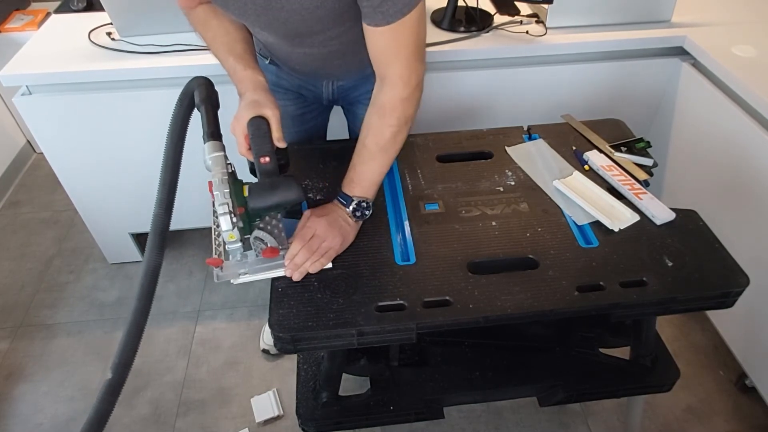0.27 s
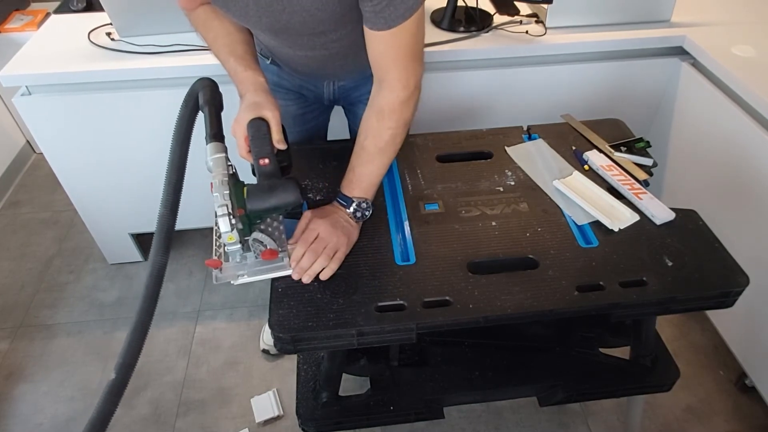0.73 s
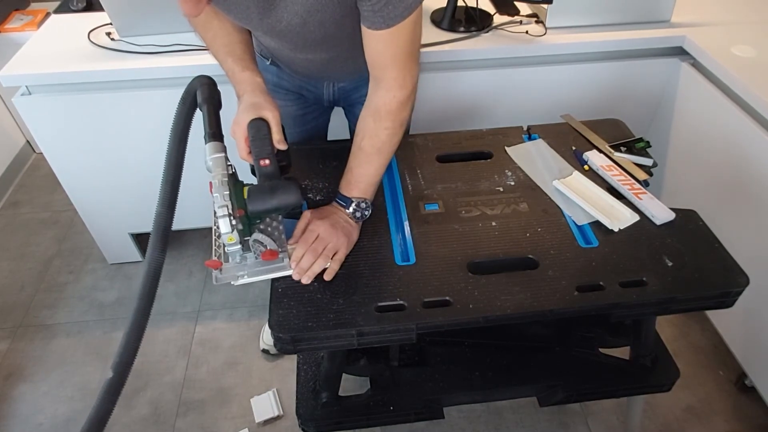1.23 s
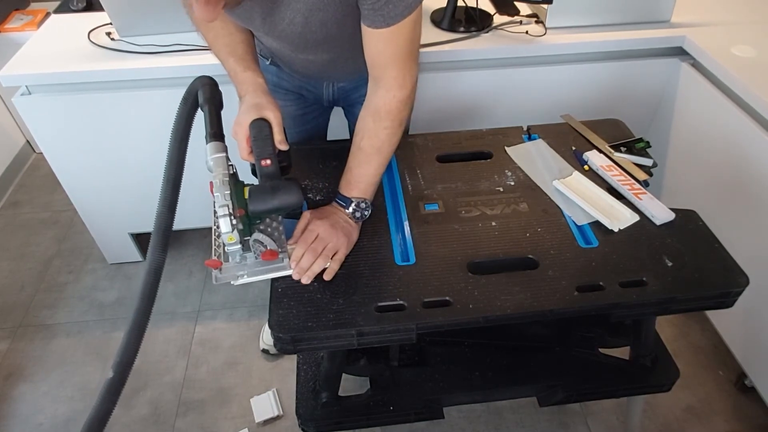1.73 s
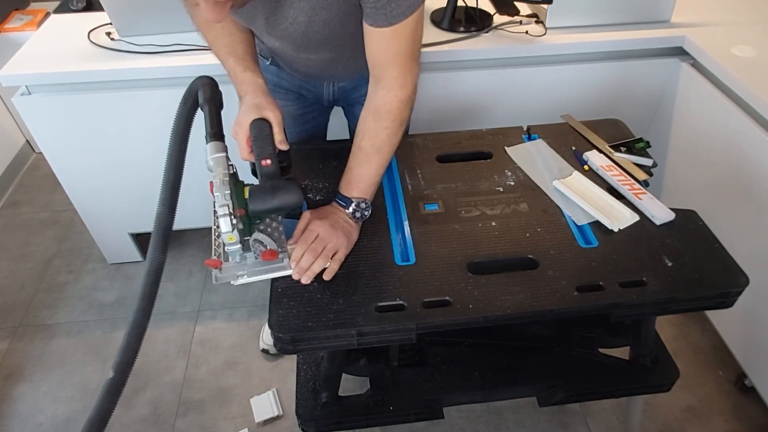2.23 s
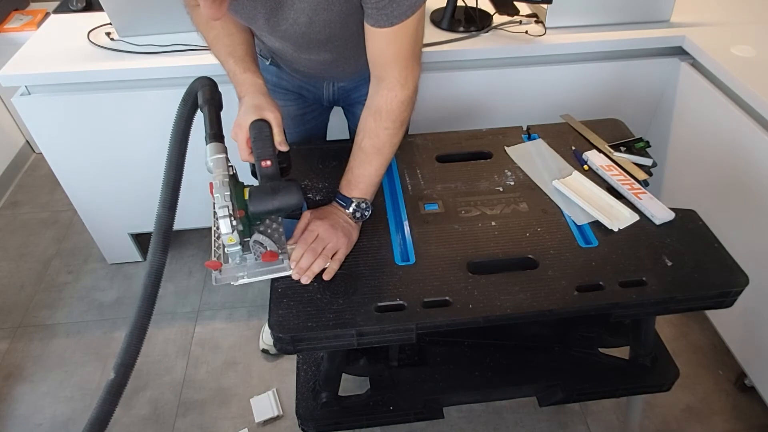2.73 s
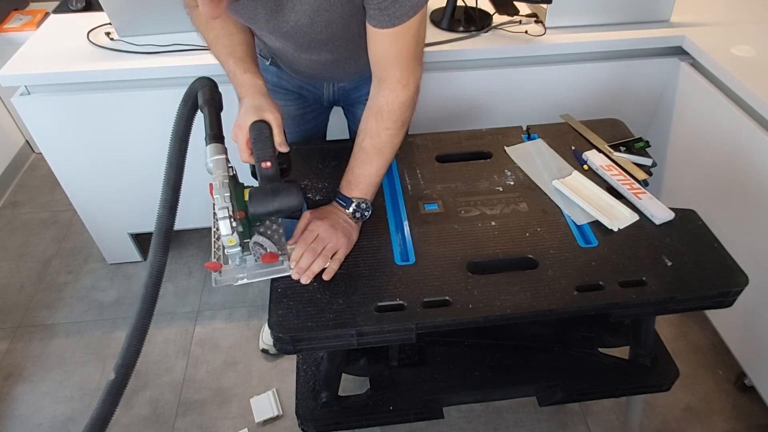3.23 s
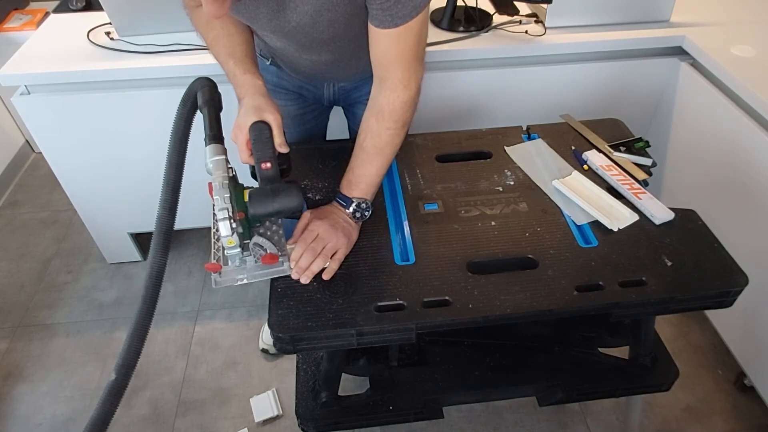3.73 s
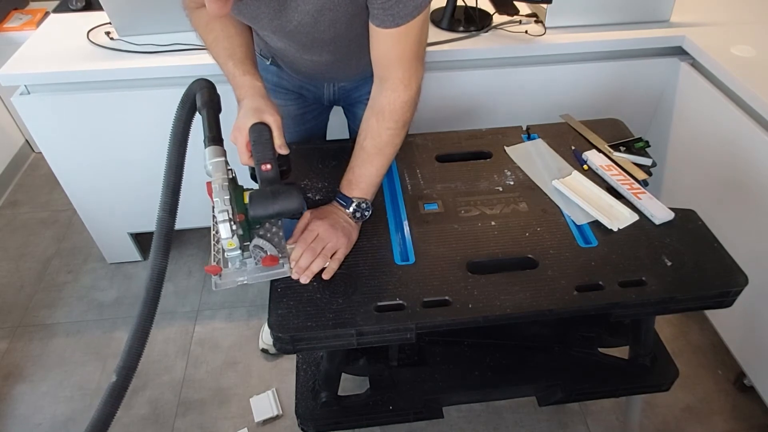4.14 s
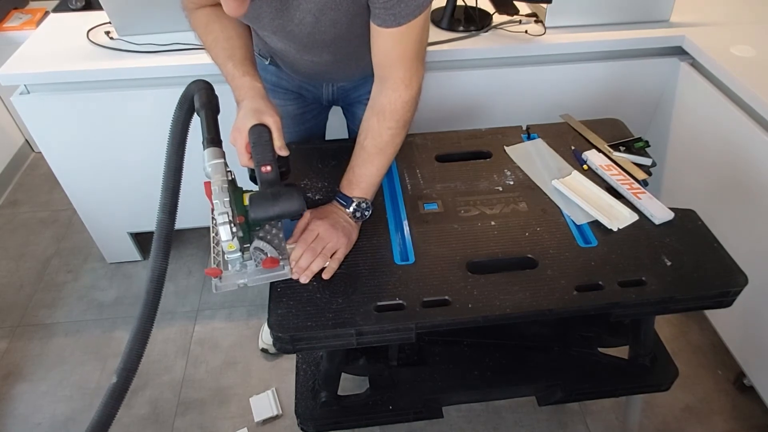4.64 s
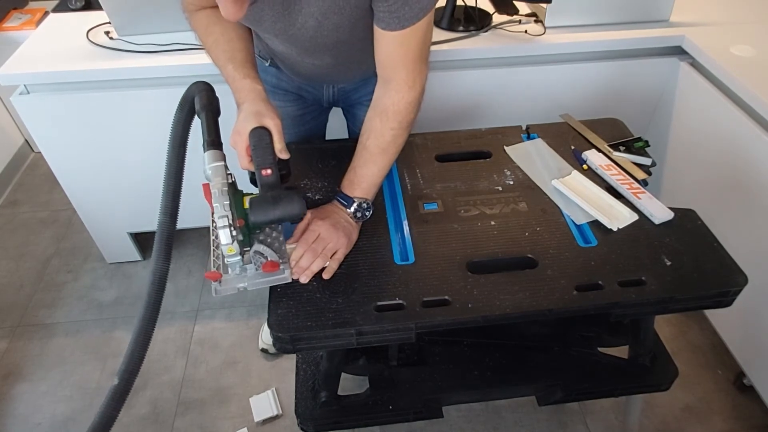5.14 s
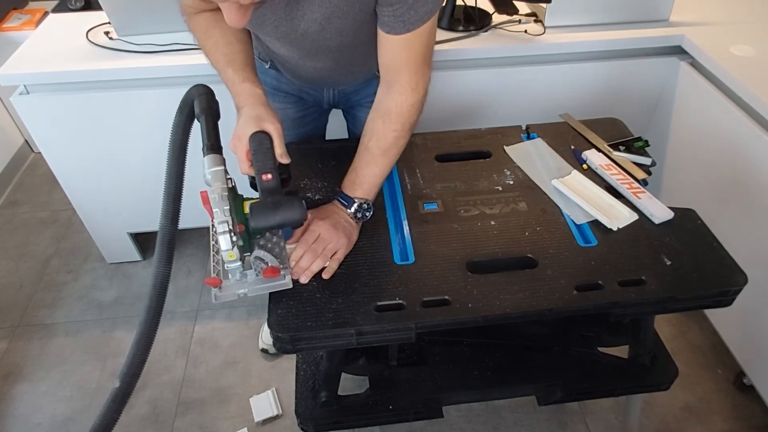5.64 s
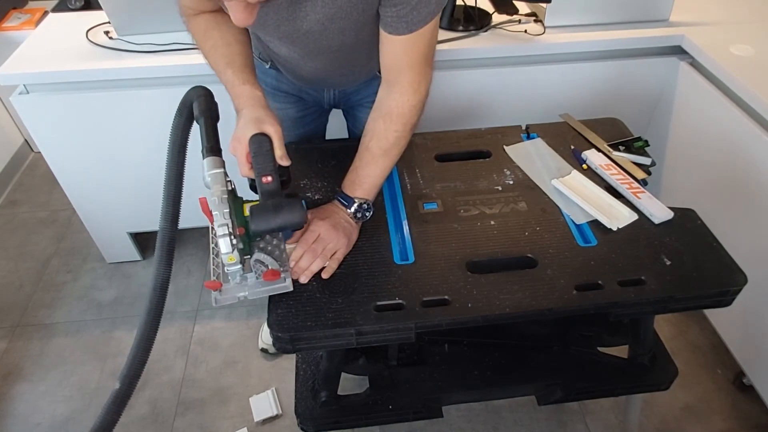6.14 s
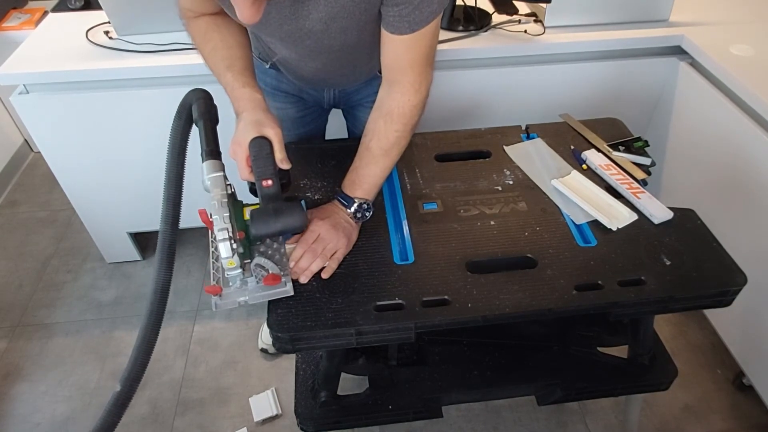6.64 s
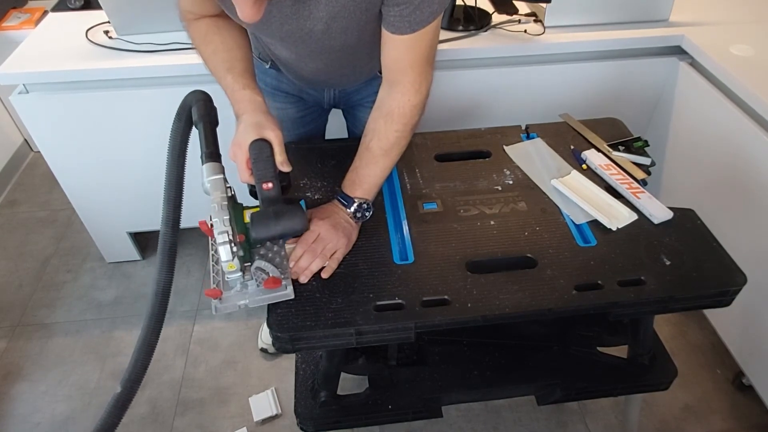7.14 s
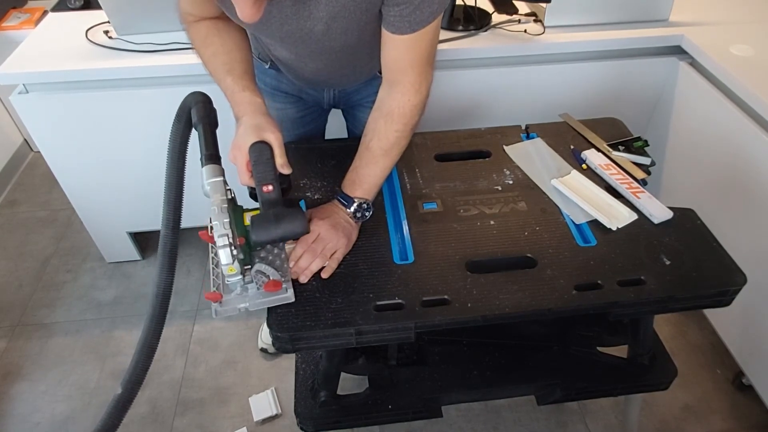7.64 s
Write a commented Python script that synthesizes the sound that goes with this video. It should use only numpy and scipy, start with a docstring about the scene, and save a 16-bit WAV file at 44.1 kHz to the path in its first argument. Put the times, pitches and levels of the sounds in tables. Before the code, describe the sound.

Faint handling comes first: short slides, low knocks and a shifting board on a bench. A handheld circular saw clicks, jolts on and spins up within a fraction of a second, rattling and whining. It cuts plastic skirting with coarse tooth crackle, metallic blade ringing, hissing dust and a wavering buzz, still cutting at the end. Hard-surfaced room with short reflections, microphone a few steps away, same sound both sides.

```python
"""Scrapes and bumps on a workbench in a bare room, a switch click, a motor kick and rising whine, a rough cut.
A small cordless circular saw cuts a plastic skirting board. Handling and the motor's kick are coloured
noise in dying bursts and strokes; the motor is rattle, puffing air and gear tones tied to the rotation.
In the cut each tooth tears crackle out of the plastic, strikes ring the blade's modes, and the speed
sags and recovers."""
import sys
import numpy as np
from scipy import signal
from scipy.fft import rfft, irfft
from scipy.io import wavfile
from scipy.ndimage import map_coordinates

SR = 44100
rng = np.random.default_rng(int(sys.argv[2]) if len(sys.argv) > 2 else 0)


def pcm_store(signal):
    """Save signal as 16-bit PCM."""
    levels = np.round(np.clip(np.atleast_2d(signal), -1, 1) * 32767)
    wavfile.write(sys.argv[1], SR, levels.astype(np.int16).T)


N = 347508
TIME = np.arange(N) / SR

# the motor is switched on, the teeth reach the board
START_S, CONTACT_S = 1.774, 2.425
# the teeth take hold within ENTRY_S; the blade is buried in the kerf after BURY_S
ENTRY_S, BURY_S = 0.1, 2.3
TEETH = 18
# width of a blade mode, and the spread of its chance swelling and fading
MODE_WIDTH_HZ, WANDER_DB = 17, 2.3


def from_db(db):
    """Decibels to gain."""
    return 10 ** (np.asarray(db) / 20)


def rms_one(x):
    """Scale to unit rms."""
    return x / np.sqrt(np.mean(x ** 2) + 1e-20)


def in_time(rows):
    """Each column of a curve, interpolated at every sample."""
    s, *columns = np.transpose(rows)
    return [np.interp(TIME, s, column) for column in columns]


def drift(rate_hz):
    """Slow chance with rms 1: noise through two equal low-pass poles, made at a 20th of the sample rate."""
    r = np.exp(-40 * np.pi * rate_hz / SR)
    noise = rng.standard_normal(N // 20 + 4002)
    slow = signal.lfilter([1], [1, -2 * r, r * r], noise)[4000:]  # drop the filter's run-in
    return np.interp(np.arange(N) / 20, np.arange(len(slow)), rms_one(slow))


def ramp(start, length):
    """A straight rise from 0 to 1."""
    return np.clip((TIME - start) / length, 0, 1)


def swell(s, half):
    """A smooth bell-shaped rise and fall around a moment."""
    return np.exp(-np.minimum(((TIME - s) / half) ** 2, 100) / 2)


def colour(x, spectrum):
    """Causal minimum-phase filter that follows a spectrum and keeps the power of white noise."""
    hz, db = np.transpose(spectrum)
    grid = np.linspace(1, SR / 2, 1025)
    gain = from_db(np.interp(np.log(grid), np.log(hz), db))
    cepstrum = irfft(np.log(gain))
    # folding the cepstrum forward makes the filter causal
    half = len(cepstrum) // 2
    cepstrum[1:half] *= 2
    cepstrum[half + 1:] = 0
    response = irfft(np.exp(rfft(cepstrum)))
    return signal.oaconvolve(x, response / np.linalg.norm(response))[:N]


def resonate(x, hz, width):
    """One two-pole resonance with gain 1 on top."""
    r = np.exp(-np.pi * width / SR)
    zeros = np.array([1, 0, -1]) * (1 - r * r) / 2
    poles = [1, -2 * r * np.cos(2 * np.pi * hz / SR), r * r]
    return signal.lfilter(zeros, poles, x)


def rotation():
    """Turns of the blade so far: it spins up exponentially to the speed that the load allows."""
    # full speed held against the load: (time [s], passing teeth [1/s])
    speed = [(2.51, 955), (2.65, 945), (3.41, 944), (4.11, 909), (4.6, 893), (4.88, 920), (5.5, 907),
             (6.34, 906), (6.48, 876), (7.04, 926), (7.8, 889)]
    # share of full speed at the first kick, time constant of the spin-up
    kick_share, spin_up_s = .16, .13
    teeth_per_s, = in_time(speed)
    # ahead of the switch-on the count runs at the kick speed, where its sounds are muted
    spun_up = 1 - (1 - kick_share) * np.exp(-np.maximum(TIME - START_S, 0) / spin_up_s)
    return np.cumsum(teeth_per_s * spun_up) / TEETH / SR


def background(turns, hum_hz=53.0, floor_db=-63, drone_db=-52, octave_db=-16):
    """Room tone and a wavering low hum; the bench drones at three times the rotation while the saw runs."""
    # low hum: (time [s], level [dB])
    hum_levels = [(0, -48), (.33, -53), (.46, -49), (1.0, -51), (1.4, -64), (7.88, -75)]
    # colour of the room tone: (frequency [Hz], level [dB])
    room_tone = [(80, -20.5), (170, -5.5), (280, -13.5), (480, -28.5), (850, -21.5), (1300, -36),
                 (2500, -45), (8000, -39), (15000, -49)]
    hum_db, = in_time(hum_levels)
    phase = 2 * np.pi * hum_hz * TIME + 0.44 * drift(2.2)
    hum = from_db(hum_db) * (np.sin(phase) + from_db(octave_db) * np.sin(2 * phase))
    shaking = np.sin(2 * np.pi * 3 * turns) * (TIME > START_S)
    drone = from_db(drone_db + 2 * drift(22)) * shaking
    floor = from_db(floor_db) * colour(rng.standard_normal(N), room_tone)
    return np.sqrt(2) * (hum + drone) + floor  # sqrt(2) takes sines from peak to rms level


def rubs(rows, spectrum):
    """Friction under short strokes: tiny slips of uneven size."""
    envelope = sum(swell(s, half) * from_db(db) for s, half, db in rows)
    slips = rms_one(from_db(4.5 * drift(350)) * rng.standard_normal(N))
    return colour(envelope * slips, spectrum)


def blows(rows, spectrum):
    """Each blow sets off a dense, quickly dying ring of coloured noise."""
    envelope = 0
    for s, db, t60 in rows:
        decay_db = -60 * np.clip((TIME - s) / t60, 0, 3)
        envelope = envelope + (TIME >= s) * from_db(db + decay_db)
    return colour(envelope * rng.standard_normal(N), spectrum)


def housing(x, level_db=-2.5):
    """Whatever touches the saw also rings its housing through a few resonances."""
    # resonances of the saw's housing: (frequency [Hz])
    housing_hz = [2751, 3420, 3850]
    rings = from_db(2) * sum(resonate(x, hz, width=160) for hz in housing_hz)
    return from_db(level_db) * (x + rings)


def handling(board_top_hz=1100):
    """The sole plate slides, saw and board shift and bump, the switch clicks and the motor kicks."""
    # the sole plate slides, ahead of the housing: (time [s], half length [s], level [dB])
    slides = [(.11, 0.072, -58.5), (.37, 0.016, -66), (.595, 0.018, -58.5), (.68, 0.03, -63.5),
              (.78, 0.016, -69)]
    # the switch clicks, the gears take up their play, ahead of the housing:
    # (time [s], level [dB], ring time t60 [s])
    clacks = [(1.658, -55.5, 0.16), (1.784, -24, 0.024)]
    # the board shifts on the bench: (time [s], half length [s], level [dB])
    shifts = [(.17, 0.13, -56), (1.15, 0.036, -61), (1.25, .035, -65)]
    # saw and board bump on the bench, and at 1.784 s the motor kicks as it starts:
    # (time [s], level [dB], ring time t60 [s])
    bumps_and_kick = [(.124, -37, 0.09), (.158, -43, .08), (.196, -38, 0.045), (.305, -53, 0.06),
                      (1.784, -16.5, 0.045)]
    # colour of slides and clicks: (frequency [Hz], level [dB])
    slide_colour = [(150, -16), (1800, 1), (3500, 3), (9000, -10), (16000, -19)]
    # colour of shifts, bumps and kick: (frequency [Hz], level [dB])
    knock_colour = [(60, -18), (290, 12), (450, -5), (800, 9), (1800, -1.5), (2400, -7.5), (3600, -7.5),
                    (16000, -63)]
    dull = signal.butter(4, board_top_hz, fs=SR, output="sos")
    shift = signal.sosfilt(dull, rubs(shifts, knock_colour))
    on_saw = rubs(slides, slide_colour) + blows(clacks, slide_colour)
    return housing(on_saw) + shift + blows(bumps_and_kick, knock_colour)


def surge(peak_db, rise_s, fall_s, idle_db):
    """Level of a motor part: it rises at switch-on, then settles to idle as the spin-up strain eases."""
    strain = np.exp(-np.maximum(TIME - START_S - rise_s, 0) / fall_s)
    return ramp(START_S, rise_s) * (from_db(idle_db) + from_db(peak_db) * strain)


def motor(turns, rough_db=0.5, throb_db=9):
    """Gears rattle in the housing, the air puffs once a turn, and rough gear mesh whines with the speed."""
    # colour of the gear rattle: (frequency [Hz], level [dB])
    rattle_colour = [(60, -34.5), (150, -11.5), (500, -5.5), (800, 2.5), (1350, 5), (2300, -1), (3600, 5.5),
                     (5100, -6), (5600, -31), (16000, -37)]
    # colour of the fan's air: (frequency [Hz], level [dB])
    fan_colour = [(2000, -3), (6600, 6.5), (8700, 7.5), (9600, -2), (11600, -5.5), (12400, 6), (13100, -3),
                  (16000, -1)]
    # rough whine of gears and motor: (multiple of the rotation [1], relative level [dB])
    whine_orders = [(35, -11), (63, -2.5), (68, -2.5), (123, -13), (133, -12)]
    gears = surge(peak_db=-24.5, rise_s=0.002, fall_s=0.37, idle_db=-26.5)
    air = surge(peak_db=-26.5, rise_s=0.077, fall_s=0.53, idle_db=-39)
    strain = surge(peak_db=-19.5, rise_s=0.17, fall_s=0.095, idle_db=-41)

    roughness = from_db(rough_db * drift(250))
    rattle = colour(rng.standard_normal(N) * gears * roughness, rattle_colour)
    puffs = rms_one(from_db(-throb_db * (turns % 1)))  # each puff fades over its turn
    fan = colour(rng.standard_normal(N) * air * puffs, fan_colour)
    mesh = 0
    for order, db in whine_orders:
        tone = np.sin(2 * np.pi * order * turns + 1.4 * drift(70))
        mesh = mesh + from_db(db + 3 * drift(60)) * tone
    return rattle + fan + mesh * strain


def rough_rings(rows):
    """Resonances shaken at random for a moment."""
    total = 0
    for s, half, hz, width, db in rows:
        ring = rms_one(resonate(rng.standard_normal(N), hz, width))
        total = total + swell(s, half) * from_db(db) * ring
    return total


def singing():
    """Blade modes swell and fade as wavering tones where the kerf rubs them; noisy resonances chatter."""
    # the kerf wall rubs one mode until it sings:
    # (time [s], half length [s], frequency [Hz], peak level [dB])
    sings = [(2.54, .045, 2013, -17.5), (2.55, .04, 1906, -21), (2.51, .05, 3817, -22),
             (2.51, .035, 3930, -25), (2.95, .13, 2417, -22), (3.3, .2, 2723, -22.5),
             (3.68, .05, 3832, -19), (4.5, .35, 3829, -24), (4.38, .1, 1798, -20), (5.52, .12, 3620, -24),
             (5.56, .08, 4030, -21), (6.05, .14, 4040, -23)]
    # rough chatters of blade and housing:
    # (time [s], half length [s], frequency [Hz], width [Hz], level [dB])
    chatters = [(1.786, 0.0045, 1900, 150, -15.5), (1.83, .04, 285, 30, -32),
                (1.818, 0.0077, 1210, 400, -14), (1.85, 0.011, 3620, 90, -10.5),
                (1.92, 0.03, 7900, 300, -23.5), (3.5, 0.16, 1770, 120, -28), (4.25, 0.099, 3870, 110, -23),
                (4.57, 0.016, 1320, 150, -14.5), (4.85, 0.16, 1380, 50, -22), (5.4, 0.63, 4730, 300, -25),
                (6.384, 0.038, 2230, 350, -15.5), (6.39, 0.057, 302, 30, -32.5)]
    tones = 0
    for s, half, hz, db in sings:
        level = swell(s, half) * from_db(db + 2 * drift(10))
        tones = tones + level * np.sin(2 * np.pi * hz * TIME + .5 * drift(8))
    return tones + rough_rings(chatters)


def bites(turns, repeat, sharpness, depth_db=1.5):
    """Every tooth tears a burst of crackle; a share repeats each turn, the rest differs chip by chip."""
    tooth, along = np.divmod(turns * TEETH, 1)
    tooth = tooth.astype(int)
    # each tooth has its own depth, and each bite adds its own chance
    depth = rms_one(rng.standard_normal(TEETH))[tooth % TEETH]
    depth = depth + rng.standard_normal(tooth[-1] + 1)[tooth]
    rim = rng.standard_normal(size=900)
    same = map_coordinates(rim, [turns % 1 * len(rim)], order=3, mode="grid-wrap")
    share = np.clip(repeat, 0, 1)
    crackle = np.sqrt(share) * same + np.sqrt(1 - share) * rng.standard_normal(N)
    return rms_one(from_db(depth_db * depth) * np.exp(-sharpness * along) * crackle)


def effort(force, level_db, follows, buried_db, db_per_s):
    """Level of one part of the cut: it follows the feed, shifts as the blade is buried, creeps along the kerf."""
    buried = buried_db * ramp(CONTACT_S, BURY_S)
    creep = db_per_s * (TIME - CONTACT_S)
    return force ** follows * from_db(level_db + buried + creep)


def blade_ring(strikes):
    """The strikes excite the steel blade's modes, each swelling and fading by chance."""
    # blade modes: (frequency [Hz], relative level at first contact [dB], change along the kerf [dB/s])
    modes = [(1365, -8, .9), (1410, 0, -.7), (1470, -4.5, -.1), (1793, 1, -.8), (1840, -5, -.3),
             (1890, -2, -1.6), (2132, -3, -.6), (2417, -4, -1.6), (2621, -4, -.8), (2724, 0, -1.4),
             (3075, -7, -1.8), (3243, -2.5, -1.6), (3472, -2, -1.2), (3530, -3, -1.1), (3618, -3, -.4),
             (3680, 0, -1.2), (3829, 4.5, -2.1), (3900, -2.5, 0), (4025, -4.5, .5), (4595, -6, .7),
             (4690, -7, -.5), (4990, -13, .9), (8300, -8, -.6), (9155, -10, -.6), (12330, -9, -.5)]
    ring = 0
    for hz, db, slope in modes:
        level_db = db + slope * (TIME - CONTACT_S) + WANDER_DB * drift(2)
        ring = ring + from_db(level_db) * rms_one(resonate(strikes, hz, MODE_WIDTH_HZ))
    return ring


def blade_sizzle(strikes):
    """The blade's high modes lie close together and sizzle under the strikes."""
    high_modes = np.geomspace(5000, 15000, num=36) + rng.normal(0, 80, size=36)
    return rms_one(sum(from_db(WANDER_DB * drift(0.48)) * resonate(strikes, hz, MODE_WIDTH_HZ)
                       for hz in high_modes))


def cutting(turns, sizzle_db=-5, flutter_db=1.0):
    """The teeth chip the plastic, shake the board, throw dust against the guard and ring the blade."""
    # how hard the saw is fed, used relative to its mean: (time [s], level [dB])
    feed = [(2.55, -11.5), (3.41, -14), (3.69, -11), (3.82, -14), (4.17, -10), (4.72, -12.5), (4.97, -11.5),
            (5.37, -12.5), (5.53, -9.5), (5.77, -13.5), (5.89, -10.5), (6.2, -11.5), (6.41, -9.5),
            (6.62, -14.5), (6.88, -11.5), (7.43, -14), (7.88, -9.5)]
    # a tooth snaps off a larger chip: (time [s], level [dB], ring time t60 [s])
    snaps = [(2.46, -14, .04), (2.663, -13, .03), (2.812, -13, 0.035), (3.18, -9.5, .03),
             (3.485, -8, 0.057)]
    # colours of chips and snaps, of the shaken board, of the dust: (frequency [Hz], level [dB])
    chip_colour = [(150, -26), (1000, -29.5), (2600, -7), (3100, -5), (3800, -.5), (4300, -3.5), (4900, -3),
                   (5600, -8.5), (16000, -20.5)]
    board_colour = [(100, -40), (300, -12), (520, -12), (750, -4), (1350, -3.5), (2300, 0), (3000, -6.5),
                    (5000, -11.5)]
    spray_colour = [(300, -49), (3000, -33), (5500, -8.5), (8200, -4.5), (9700, -7.5), (11600, -5.5),
                    (12350, -6), (12900, -3), (15800, -9.5)]
    feed_db, = in_time(feed)
    force = ramp(CONTACT_S, ENTRY_S) * from_db(feed_db - feed_db.mean() + flutter_db * drift(62))
    chip = effort(force, level_db=-22.5, follows=1.2, buried_db=1.0, db_per_s=0.0)
    board = effort(force, level_db=-26.5, follows=1.35, buried_db=4, db_per_s=0.43)
    spray = effort(force, level_db=-21.5, follows=0.99, buried_db=2.0, db_per_s=-1.39)
    blade = effort(force, level_db=-28.5, follows=0.8, buried_db=.5, db_per_s=0)

    chips = colour(chip * bites(turns, repeat=0.26, sharpness=0.77), chip_colour)
    shake = colour(board * bites(turns, repeat=0.41, sharpness=1.7), board_colour)
    dust = colour(spray * bites(turns, repeat=0.69, sharpness=0.5), spray_colour)
    strikes = bites(turns, repeat=0, sharpness=2.1)
    ring = blade * blade_ring(strikes)
    sizzle = from_db(sizzle_db) * spray * blade_sizzle(strikes)
    return chips + blows(snaps, chip_colour) + shake + dust + ring + sizzle


def tooth_tone(turns, waver_db=3.5, beat_db=1.5):
    """Regular tooth strikes: run-out tones at multiples of the rotation, and a buzz at the tooth rate."""
    # blade run-out, side tones around the tooth tone and its octave:
    # (multiple of the rotation [1], level [dB])
    runout = [(13, -42), (15, -41), (16, -34.5), (17, -37), (18, -36), (20, -45), (27, -40), (32, -44),
              (36, -39)]
    # the teeth bite evenly and their buzz swells: (time [s], half length [s], level [dB])
    buzzes = [(2.583, 0.057, -26), (3.028, 0.14, -28), (4.96, 0.13, -24), (6.175, 0.24, -28),
              (6.474, 0.057, -25.5), (6.864, 0.087, -21.5), (7.183, 0.17, -22.5)]
    sides = 0
    for order, db in runout:
        tone = np.sin(2 * np.pi * order * turns + .45 * drift(9))
        sides = sides + tone * from_db(db + waver_db * drift(3.9))
    even = sum(swell(s, half) * from_db(db) for s, half, db in buzzes) * from_db(beat_db * drift(20))
    flutter = 1 + .5 * np.cos(2 * np.pi * turns + .5 * drift(6))  # once a turn
    buzz = even * flutter * np.cos(2 * np.pi * TEETH * turns)
    return np.sqrt(2) * (ramp(CONTACT_S, ENTRY_S) * sides + buzz)


def room(x, wet_db=-9, wall_hz=6000, t60_s=0.52):
    """Diffuse reflections: a dying noise tail, dulled by the walls."""
    t = TIME[:SR // 2]
    tail = rng.standard_normal(len(t)) * from_db(-60 * t / t60_s) * (t > .006)
    tail = signal.sosfilt(signal.butter(1, wall_hz, fs=SR, output="sos"), tail)
    return x + from_db(wet_db) * signal.oaconvolve(x, tail / np.linalg.norm(tail))[:N]


def scene():
    """One blade speed drives motor and cut; both channels carry the same sound."""
    turns = rotation()
    tones = (tooth_tone(turns) + singing()) * (TIME > START_S)
    in_room = room(motor(turns) + cutting(turns) + handling())
    mono = in_room + tones + background(turns)
    return np.array([mono, mono])


def record(dry, cutoff_hz=15800):
    """The highest peaks are rounded, rumble and top are cut."""
    rounded = dry / (1 + (dry / .92) ** 8) ** (1 / 8)
    lean = signal.sosfilt(signal.butter(2, 35, "high", fs=SR, output="sos"), rounded)
    return signal.sosfilt(signal.ellip(12, .1, 80, cutoff_hz, fs=SR, output="sos"), lean)


dry = scene()
out = record(dry)
pcm_store(out)
```